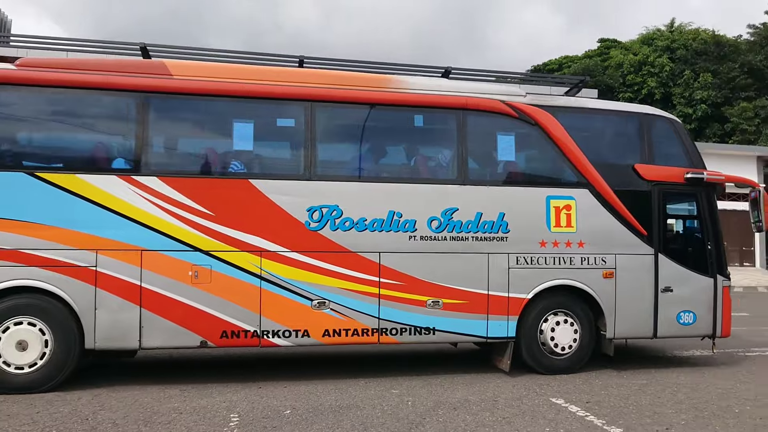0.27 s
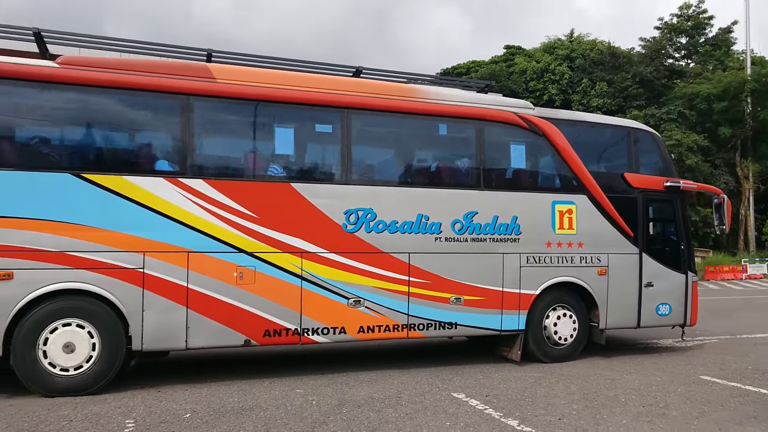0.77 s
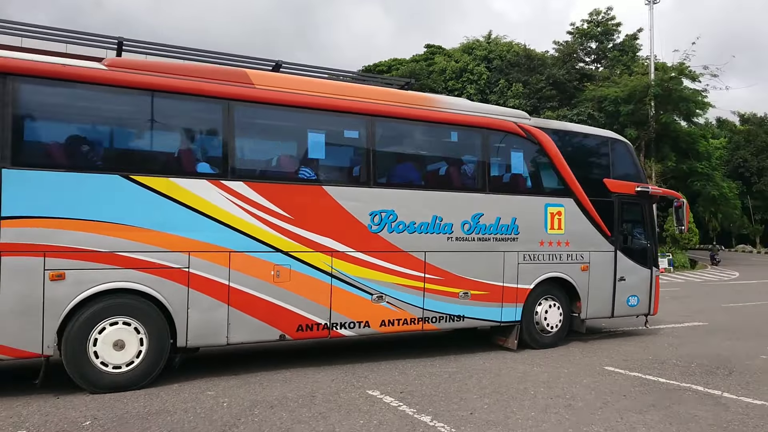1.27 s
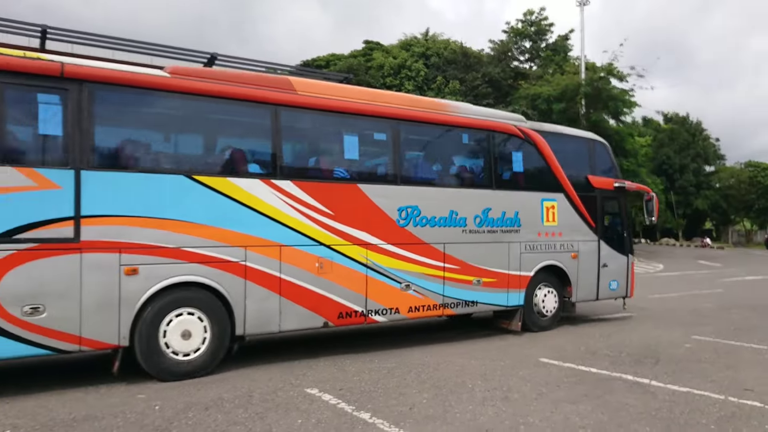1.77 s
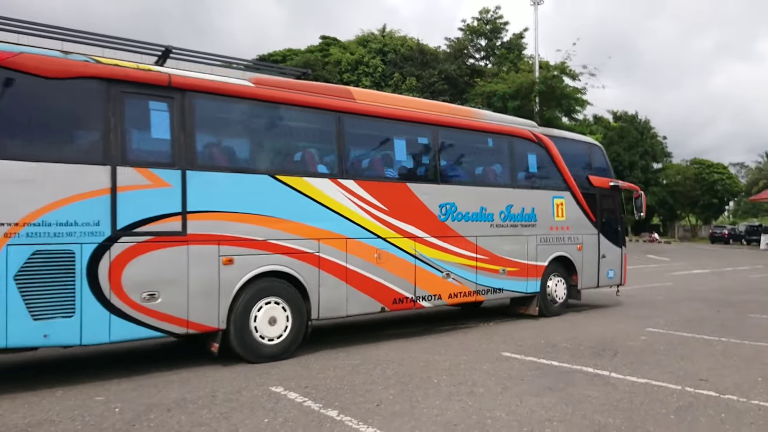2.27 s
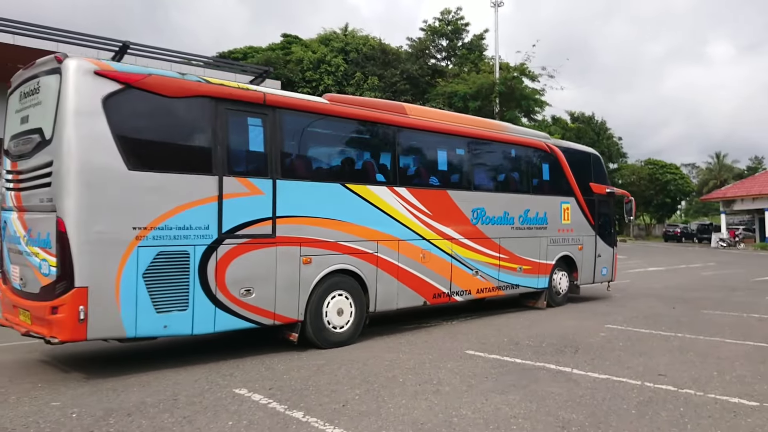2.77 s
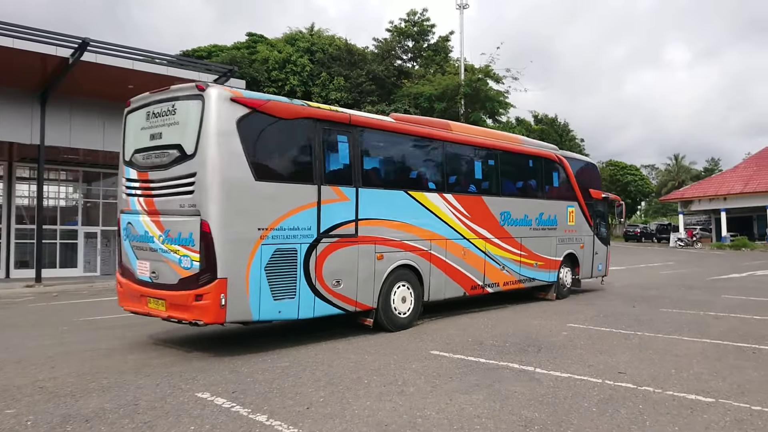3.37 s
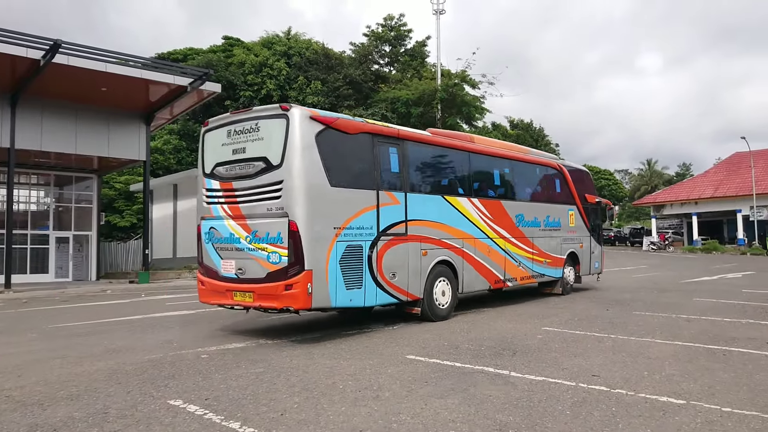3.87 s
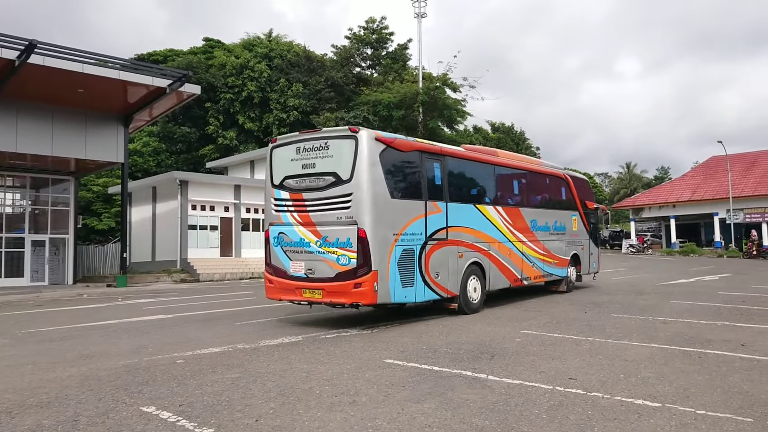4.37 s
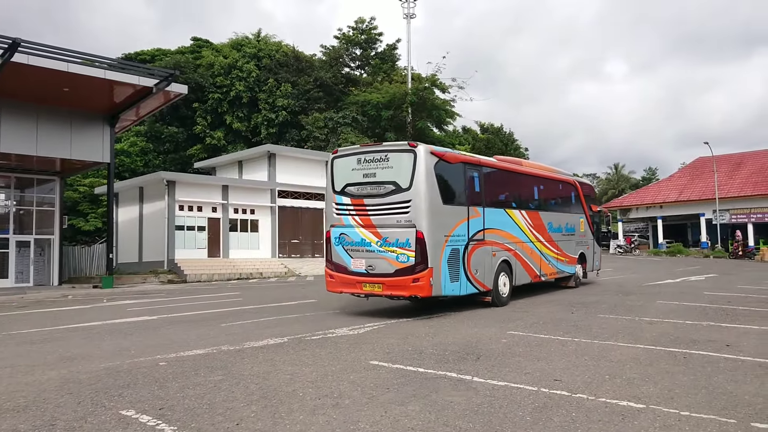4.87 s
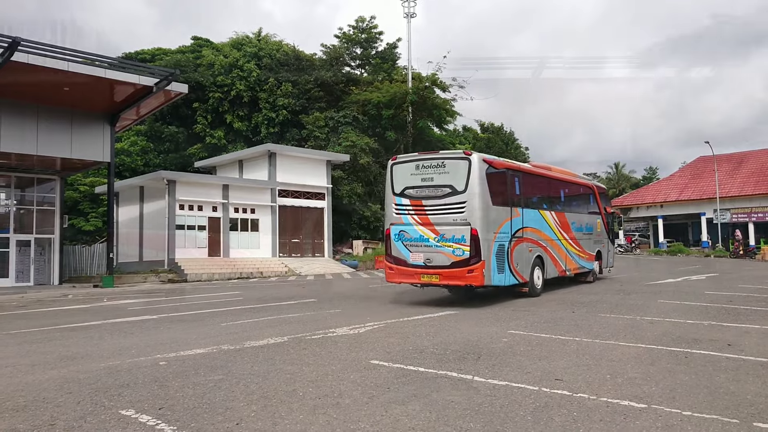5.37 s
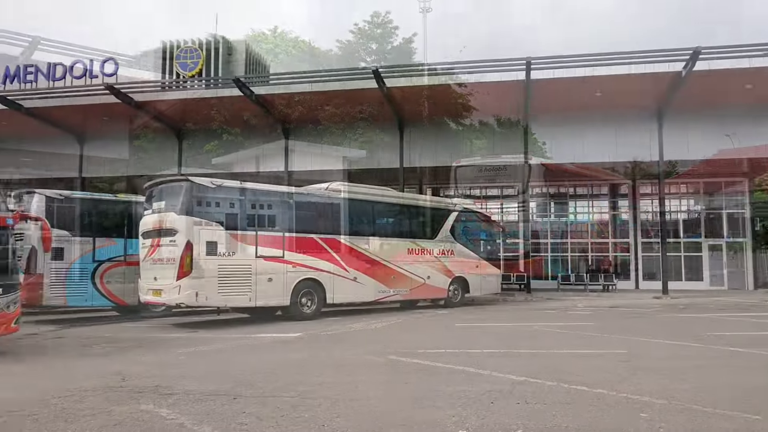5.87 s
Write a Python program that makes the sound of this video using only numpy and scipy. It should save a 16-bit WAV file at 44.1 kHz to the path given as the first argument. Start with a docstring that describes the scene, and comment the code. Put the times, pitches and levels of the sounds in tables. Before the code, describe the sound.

Heard close by on a phone outdoors, a diesel bus lets its revs sink, then takes up the load and rolls past, booming and clattering over a humming fan and a few faint squeaks. Compressed air suddenly blows off in a bright hiss with a wavering whistle. The hiss stops, and the deep engine keeps rising in pitch as it moves away, echoing slightly off the terminal buildings.

```python
"""A diesel coach pulls away across a paved terminal. First the revs drop, with a rasp and a faint turbo
whistle. Then the throttle opens and the clutch takes up: firings boom in the exhaust and clatter in the block,
the cooling fan hums and roars. As the rear engine draws level, a valve blows off compressed air in a whistling
hiss. The air runs out, the tail turns to us and the engine climbs on; then the whole scene fades. A phone with
two microphone ports hears it all directly and off the terminal fronts."""
import sys
import numpy as np
from scipy import signal
from scipy.fft import rfft, irfft, next_fast_len
from scipy.io import wavfile
from scipy.ndimage import uniform_filter1d, map_coordinates

SR = 44100
rng = np.random.default_rng(int(sys.argv[2]) if len(sys.argv) > 2 else 0)


def to_wav(s):
    """Save 16-bit WAV."""
    ch = np.atleast_2d(s).T  # columns
    pcm = np.round(np.clip(ch, -1, 1) * 32767)  # PCM
    wavfile.write(sys.argv[1], SR, pcm.astype(np.int16))


N = 269892
TIME = np.arange(N) / SR
THROTTLE_S, TAIL_TURN_S = (0.84, 1.91), (2.72, 5.17)  # throttle opens, tail turns to us: from, to

# Level laws: dB abreast at cruising revs, dB per octave of revs, dB more off throttle, dB more from behind
CRUISE_HZ = 60
ORDERS_LAW, THROB_LAW = (-40.5, -6, -5, 5.5), (-35, 10, 5, -2.5)
RUMBLE_LAW, WASH_LAW = (-23, 11.5, 0.1, -0.5), (-29, 11.5, -0.4, 2.5)
CLATTER_LAW, KNOCK_LAW = (-32.5, 10, -4.5, 0.5), (-41.5, 8, -1, -3)
LOWER_RING_LAW, UPPER_RING_LAW = (-36.5, 27.5, -8, -14), (-56, 13, -1, 8)


# Fader ride of the boom at the firing rate: t/s, level/dB
BOOM_RIDE = [(0,-31),(.5,-35),(1.1,-38),(1.4,-34),(1.7,-26),(2.1,-28.5),(2.9,-24.5),(3.2,-20.5),(3.8,-19.5),(4.1,-17.5),(4.4,-22.5),(4.7,-23.5),(5.0,-27),(5.25,-22.5),(5.75,-22),(6.12,-26.5)]
# Engine orders around the boom: multiple of the firing rate, level/dB
ENGINE_ORDERS = [(.75,0.5),(1.97,-3),(3,-1)]
# Bass-heavy EQ of the exhaust puffs: f/Hz, level/dB
RUMBLE_EQ = [(20, -47), (33, -25), (45, 4.5), (60, -0.5), (90, 3.5), (130, 1), (200, -1), (270, -3),
             (350, -7), (450, -13), (600, -32), (1200, -65)]

def exhaust(firing_hz):
    """The silencer booms at the firing rate, unequal cylinders throb and turbulent puffs rumble."""
    boom_db, = curves(BOOM_RIDE)
    boom = partials(firing_hz, [(1, 0)], rough=0.09, flutter_hz=13) * undb(boom_db)
    orders = sum(partials(k * firing_hz, [(1, db)], rough=0.2, flutter_hz=9) * body_gain(k * firing_hz)
                 for k, db in ENGINE_ORDERS)
    throb = partials(firing_hz, [(1.53, 0)], rough=0.24, flutter_hz=12)
    puffs = unit(colour(bursts(firing_hz, decay_cycles=0.13, scatter_db=-0.5, steady=0.74), RUMBLE_EQ))
    bass = signal.sosfilt(signal.butter(1, 75, fs=SR, output="sos"), puffs)
    rumble = puffs - 0.44 * coasting() * bass  # thinner off the throttle
    return (boom + orders * loudness(firing_hz, ORDERS_LAW) + throb * loudness(firing_hz, THROB_LAW)
            + rumble * loudness(firing_hz, RUMBLE_LAW))


# Resonant peaks of silencer and body: f/Hz, width/Hz, lift/dB
BODY_PEAKS = [(56.6,3.6,15),(107,12,5),(144.8,4.7,15.5),(150.5,3.9,13),(168.5,5,4),(176,4.8,8.5),(189,5.3,9.5)]

def body_gain(hz):
    """An engine order blooms as it sweeps through a resonance of silencer or body."""
    lift = sum(undb(db) ** 2 / (1 + (2 * (hz - centre) / width) ** 2) for centre, width, db in BODY_PEAKS)
    return np.sqrt(1 + lift)


# Bright, metallic EQ of the block: f/Hz, level/dB
CLATTER_EQ = [(600, -16), (1200, 0.5), (1700, 0), (2200, 2), (2850, 0.5), (3200, -2.5), (3600, -3),
              (4400, 2.5), (5000, -5), (5600, -7.5), (6500, -18), (9000, -11.5), (10500, -18.5),
              (15500, -16.5)]
# Midrange EQ of the off-throttle rasp: f/Hz, level/dB
RASP_EQ = [(600, -36), (1100, 8.5), (1600, 1.5), (2200, 5.5), (2700, -12), (3300, 0), (3700, 2), (4300, 0),
           (5500, -37), (9000, -42)]

def block_clatter(firing_hz):
    """Combustion and valve gear ring the engine block; off the throttle a rasp joins in."""
    clatter = unit(colour(bursts(firing_hz, decay_cycles=0.49, scatter_db=5, steady=0.95), CLATTER_EQ))
    rasp = coasting() * unit(colour(noise(), RASP_EQ)) * undb(1)
    grille_db = 3.4 * swell(2.89, length_s=2)  # the side grille beams the sound as it goes by
    flicker_db = 0.5 * wander(3.4)
    return (clatter + rasp) * loudness(firing_hz, CLATTER_LAW) * undb(grille_db + flicker_db)


# Dry, boxy EQ of the knock: f/Hz, level/dB
KNOCK_EQ = [(400, -24), (700, -2), (1300, 0), (1900, -4.5), (3200, -10), (5000, -26), (8000, -46)]

def knock(firing_hz):
    """Some firings land harder than others and knock through the engine cover."""
    blows = bursts(firing_hz, decay_cycles=0.16, scatter_db=4, steady=0.22)
    return unit(colour(blows, KNOCK_EQ)) * loudness(firing_hz, KNOCK_LAW)


# Blade rate and fader ride of the fan hum: t/s, f/Hz, level/dB
HUM_RIDE = [(0,340.6,-26.5),(.22,298,-24.5),(.45,256,-37),(1.1,177,-51),(1.5,266.8,-37),(1.75,270.3,-32),(1.98,261.6,-34.5),(2.15,255,-44),(2.55,240.5,-44),(3.15,270.7,-30),(3.6,282.5,-45),(3.76,286.6,-31.5),(4.1,295,-27),(4.38,310,-28),(4.58,320.6,-35),(4.8,327.5,-29.5),(5.12,336,-32),(5.27,339.4,-45),(5.5,347,-35.5),(5.82,360,-33.5),(6.12,357,-35.5)]
# Harmonics of the hum: multiple of the blade rate, level/dB
HUM_HARMONICS = [(1, 0), (2, -24)]
# EQ of the fan's wash before the tail turns: f/Hz, level/dB
WASH_SIDE_EQ = [(150, 4.5), (350, 4.5), (500, 2), (660, -1.5), (800, 3.5), (950, 4.5), (1200, -5.5),
                (1700, -10), (2600, -13.5), (5000, -45)]
# EQ of the wash from behind: f/Hz, level/dB
WASH_REAR_EQ = [(150, -10), (350, 7), (500, 1), (720, 4.5), (900, 0), (1150, -4.5), (1700, -9.5),
                (3000, -8.5), (5000, -33)]

def fan(firing_hz):
    """Belt-driven blades hum in uneven inflow and push a broad wash through the grille."""
    blade_hz, hum_db = curves(HUM_RIDE)
    hum = partials(blade_hz, HUM_HARMONICS, rough=0.07, flutter_hz=21) * undb(hum_db)
    behind = ramp(*TAIL_TURN_S)
    side = np.sqrt(1 - behind) * unit(colour(noise(), WASH_SIDE_EQ))
    rear = np.sqrt(behind) * unit(colour(noise(), WASH_REAR_EQ))
    wash = (side + rear) * undb(0.5 * wander(22)) * loudness(firing_hz, WASH_LAW)
    return hum, wash


# Sizzling EQ of the compressed air: f/Hz, level/dB
HISS_EQ = [(1200, -2), (2000, 7.5), (2700, 9.5), (3400, 9), (4200, 11.5), (5200, 10), (6200, 2),
           (8300, 12.5), (10000, 3.5), (13500, 5), (15500, 8.5)]

def air_jet(opens_s=2.275, attack_s=0.07, closes_s=4.32):
    """A valve blows off in a swirling, sputtering jet that sags slowly and dies fast once it closes."""
    envelope_db = -25.5 - 0.5 * (TIME - opens_s) - 30 * since(closes_s)
    accent_db = np.exp(-since(opens_s) / 0.4)  # the first rush is a touch louder
    sputter_db = 0.9 * wander(12)
    valve = ramp(opens_s, opens_s + attack_s)
    _, distance_db = drive_by()
    hiss = unit(colour(swirl(), HISS_EQ))
    return valve * hiss * undb(envelope_db + accent_db + distance_db + sputter_db)


def swirl(depth_db=2, width_hz=270, life_s=0.05, sink_hz_per_s=900):
    """Jet noise whose resonances come and go by chance, sinking while they last."""
    hz, s, frames = signal.stft(noise(), SR, nperseg=512)
    lift = rng.standard_normal(frames.shape)
    for _ in range(2):
        lift = uniform_filter1d(lift, int(width_hz / hz[1]), axis=0)
        lift = uniform_filter1d(lift, int(life_s / s[1]), axis=1)
    rows, columns = np.indices(frames.shape)
    lift = map_coordinates(lift, [rows + sink_hz_per_s * s / hz[1], columns], order=1, mode="mirror")
    _, swirled = signal.istft(frames * undb(depth_db * unit(lift)), SR)
    return unit(swirled[:N])


# Pitch and fader ride of the jet's lead whistle: t/s, f/Hz, level/dB
WHISTLE_RIDE = [(2.27,4800,-80),(2.35,4820,-33),(2.58,4780,-33),(2.72,4680,-33),(2.8,4750,-39),(2.92,4840,-29.5),(3.02,4660,-29),(3.13,4580,-24),(3.27,4490,-31),(3.38,4480,-43),(3.48,4640,-33),(3.62,4540,-27),(3.74,4430,-27),(3.95,4390,-41),(4.1,4460,-36),(4.28,4440,-41),(4.47,4500,-35),(4.62,4470,-42),(4.76,4460,-42),(5.0,4460,-80)]

def jet_whistle(waver_hz=25, rasp_db=3):
    """The jet sings one raspy, breathy note that dips in pitch, then holds as the air runs out."""
    hz, db = curves(WHISTLE_RIDE)
    hz = hz + waver_hz * wander(30)
    core = band(hz, width_hz=130) * undb(rasp_db * wander(160))
    breath = band(hz, width_hz=650)
    return unit(unit(core) + breath) * undb(db)


# Cues for the jet's side whistles: peak t/s, length/s, f/Hz, glide/(Hz/s), width/Hz, level/dB
FLARE_CUES = [(2.6,0.63,10400,3,1300,-38.5),(2.62,0.52,13700,4,1700,-35),(2.5,.3,5300,0,400,-35),(2.47,0.28,3100,595,300,-33),(2.3,.09,3680,0,130,-35),(3.08,.13,2740,0,98,-31),(3.27,.24,4080,-500,220,-35),(3.2,.4,6100,-400,500,-34.5),(3.25,0.46,9150,307,800,-35),(3.08,.2,15000,-4000,690,-38),(3.35,.8,15000,-2200,710,-45),(3.46,.22,5100,-700,100,-34),(4.1,.16,5980,0,160,-39),(3.63,0.17,10500,0,970,-37.5),(2.9,0.15,11000,0,980,-39),(3.95,0.41,10000,-3000,560,-42.5),(3.96,0.067,5780,0,140,-39),(4.28,.5,4700,2,490,-38),(4.78,0.38,5400,0,140,-41)]

def jet_flares():
    """Other pitches break out of the jet briefly, some steady and some gliding."""
    out = np.zeros(N)
    for s, length, hz, glide, width_hz, db in FLARE_CUES:
        on = np.abs(TIME - s) < length / 2
        flare = band(hz + glide * (TIME[on] - s), width_hz, size=on.sum())
        out[on] += flare * swell(s, length)[on] * undb(db)
    return out


def air_rings(firing_hz):
    """Rushing air sings in two breathy bands; a sharper ring leaps out as the valve blows off."""
    lower = band(lower_ring_hz(), width_hz=420) * loudness(firing_hz, LOWER_RING_LAW)
    leap = band(2760, width_hz=210) * undb(-26.5) * swell(2.53, length_s=0.27)
    upper = band(4360, width_hz=590) * loudness(firing_hz, UPPER_RING_LAW)
    return lower + leap + upper


def lower_ring_hz():
    """The lower ring sinks in pitch as the coach passes."""
    bearing_sine, _ = drive_by()
    return 2688 - 409 * bearing_sine


# Cues for squeaks, groans and puffs: peak t/s, length/s, f/Hz, width/Hz, level/dB
SQUEAK_CUES = [(0.05,.12,1000,51,-35),(0.335,0.15,966,31,-33),(0.75,0.14,492,49,-34),(0.868,0.077,12000,5000,-52),(0.906,0.055,2880,260,-35),(1.228,0.12,210.6,54,-23),(1.34,0.088,95,30,-22),(1.5,.6,341,116,-30),(1.805,0.84,2138,374,-36.5),(1.83,0.55,2800,300,-37),(1.8,1,5600,450,-45.5),(1.901,0.34,204,7,-27.5),(2.163,0.27,165.2,10,-28),(2.51,0.13,86.9,11,-20),(2.7,0.8,299.8,40,-31),(3.372,0.28,1798,510,-30.5),(4.23,0.47,2322,332,-33.5),(5.2,.6,2980,300,-39),(6.031,.2,4580,236,-38)]

def squeaks():
    """Rubbing parts and small leaks sound briefly, swelling and fading."""
    return sum(band(hz, width) * swell(s, length) * undb(db) for s, length, hz, width, db in SQUEAK_CUES)


# Pitch and fader ride of the turbo: t/s, f/Hz, level/dB
TURBO_RIDE = [(0, 13400, -68), (.4, 11600, -73), (.8, 9650, -74), (1.1, 8900, -100)]

def turbo():
    """Off the throttle the turbocharger runs down with a thin whistle."""
    hz, db = curves(TURBO_RIDE)
    return band(hz, width_hz=200) * undb(db)


# Head start of the left port: t/s, lead/ms
LEFT_LEAD = [(0, 0.34), (1.8, 0.4), (3.2, .25), (6.1, 0.099)]

def direct_path(x, right_lift_db=1.1):
    """The straight path reaches the left port first, less so as the coach moves ahead."""
    lead_ms, = curves(LEFT_LEAD)
    return np.array([x * undb(-right_lift_db / 2), delayed(x, lead_ms / 1000) * undb(right_lift_db / 2)])


def close_reflection(x, echo):
    """One close reflection adds a hollow comb whose fourth tooth tracks the lower ring."""
    return (x + echo * delayed(x, 4 / lower_ring_hz())) / np.sqrt(1 + echo ** 2)


def building_echoes(x, t60_s, count=14):
    """Each path off the buildings has its own bearing and stretches or shrinks as the coach rolls."""
    out, power = np.zeros((2, N)), 0
    port_lags_s = 0.00025 * rng.permutation(np.linspace(-1, 1, count))
    for delay_s, lag_s in zip(np.linspace(0.025, 0.16, count), port_lags_s):
        stretch = rng.choice([-1, 1]) * rng.uniform(0.002, 0.006)
        path_s = delay_s + stretch * (TIME - TIME.mean())
        emitted_s = np.array([TIME - path_s + lag_s, TIME - path_s - lag_s])
        gain = undb(-60 * delay_s / t60_s)
        out += gain * x[np.abs(emitted_s * SR).astype(int) % N]
        power += gain ** 2
    return out / np.sqrt(power)


def drive_by(speed_m_s=4, abreast_s=2.57, nearest_m=7):
    """The engine rolls past: the sine of its bearing, and its level in dB from distance."""
    along_m = speed_m_s * (TIME - abreast_s)
    distance_m = np.hypot(along_m, nearest_m)
    return along_m / distance_m, 20 * np.log10(nearest_m / distance_m)


def loudness(firing_hz, law):
    """Gain of a layer from revs, throttle, the side of the coach that is heard, and distance."""
    db, per_octave_db, coasting_db, behind_db = law
    _, distance_db = drive_by()
    return undb(db + per_octave_db * np.log2(firing_hz / CRUISE_HZ) + coasting_db * coasting()
                + behind_db * ramp(*TAIL_TURN_S) + distance_db)


def coasting():
    """1 off the throttle, falling to 0 as it opens."""
    return 1 - ramp(*THROTTLE_S)


def partials(hz, table, rough, flutter_hz):
    """Partials locked to a shaft; each flutters in level and phase."""
    angle = 2 * np.pi * np.cumsum(hz) / SR
    out = 0
    for multiple, db in table:
        phase = multiple * angle + rng.uniform(0, 2 * np.pi)
        tone = (1 + rough * wander(flutter_hz)) * np.sin(phase)
        jitter = rough * wander(flutter_hz) * np.cos(phase)
        out = out + undb(db) * (tone + jitter)
    return out * np.sqrt(2 / (1 + 2 * rough ** 2))


def bursts(firing_hz, decay_cycles, scatter_db, steady):
    """Noise that leaps by a random amount at each firing and decays towards a steady bed."""
    cycles = np.cumsum(firing_hz) / SR
    strength = undb(scatter_db * noise())[cycles.astype(int)]
    return noise() * (steady + strength * np.exp(-(cycles % 1) / decay_cycles))


def band(hz, width_hz, size=N):
    """Noise in a narrow resonance whose centre may move."""
    angle = 2 * np.pi * np.cumsum(hz * np.ones(size)) / SR
    return (wander(width_hz, size) * np.sin(angle) + wander(width_hz, size) * np.cos(angle)) / np.sqrt(2)


def wander(rate_hz, size=N):
    """Smooth random modulation at rms 1 that changes about rate_hz times a second."""
    span = max(int(SR / rate_hz), 1)
    smoothed = uniform_filter1d(rng.standard_normal(size), span, mode="wrap")
    return unit(uniform_filter1d(smoothed, span, mode="wrap"))


def noise():
    """White noise."""
    return rng.standard_normal(N)


def colour(x, eq):
    """Apply an EQ curve of (f/Hz, level/dB) points."""
    hz, db = np.transpose(eq)
    size = next_fast_len(N + SR // 2, real=True)
    bin_hz = np.maximum(np.arange(size // 2 + 1) * SR / size, 1)
    gain = undb(np.interp(np.log(bin_hz), np.log(hz), db))
    return irfft(rfft(x, size) * gain, size)[:N]


def delayed(x, seconds):
    """The sound after a path whose length may change."""
    return map_coordinates(x, [np.arange(N) - seconds * SR], order=3, mode="mirror")


def curves(table):
    """The columns of a timed table as automation, one value a sample."""
    s, *columns = np.transpose(table)
    return [np.interp(TIME, s, column) for column in columns]


def ramp(start_s, end_s):
    """Goes from 0 to 1 between two times."""
    return np.interp(TIME, [start_s, end_s], [0, 1])


def swell(peak_s, length_s):
    """A rounded rise and fall around a moment."""
    return np.cos(np.pi * np.clip((TIME - peak_s) / length_s, -0.5, 0.5))


def since(start_s):
    """Seconds since a cue, 0 before it."""
    return np.maximum(TIME - start_s, 0)


def undb(db):
    """Decibels to gain."""
    return 10 ** (np.asarray(db) / 20)


def unit(x):
    """Scale to rms 1."""
    return x / np.sqrt(np.mean(x ** 2))


# The revs, as the engine's firing rate: t/s, f/Hz
FIRING_RATE = [(0, 78.8), (.4, 61.43), (.9, 42.7), (1.1, 42.07), (1.3, 55.73), (1.55, 62.63), (1.85, 61.9),
               (2.2, 54.57), (3.1, 61.26), (4.05, 67.24), (4.8, 76.2), (6.12, 83.95)]

def scene(fade_from_s=5.35, fade_db_per_s=9.5):
    """Four buses of coach sound, mixed direct and sent to the building echoes; all fades at the end."""
    firing_hz, = curves(FIRING_RATE)
    hum, wash = fan(firing_hz)
    low = exhaust(firing_hz) + hum
    clatter = close_reflection(block_clatter(firing_hz), echo=0.15)
    high = wash + clatter + knock(firing_hz) + air_rings(firing_hz) + squeaks() + turbo()
    jet = air_jet() + jet_flares()
    whistle = jet_whistle()
    direct = low + undb(-5) * high + undb(-3) * jet + undb(-5.5) * whistle
    send = undb(-19) * low + undb(-3) * high + undb(-2) * jet + undb(-6.5) * whistle
    fade = undb(-fade_db_per_s * since(fade_from_s))
    return fade * (direct_path(direct) + building_echoes(send, t60_s=0.55))


# EQ of the microphone ports: f/Hz, left level/dB, right level/dB
PORT_EQ = [(15,-32,-28),(42,-5.5,-4.5),(57,-2.5,-6),(330,4.5,4.5),(5800,2.5,3),(6314,-3.5,7),(6570,-5.5,-52),(7530,-29.5,-64),(8050,-7.5,-52),(8590,-9,-48),(10060,7,-8),(12600,7,-3.5),(15000,1.5,-13)]

def record(dry, top_hz=15600):
    """Both ports have a deep notch in the treble, the right one is duller; the top is cut."""
    eq = np.array(PORT_EQ)
    heard = np.array([colour(dry[0], eq[:, [0, 1]]), colour(dry[1], eq[:, [0, 2]])])
    return signal.sosfilt(signal.ellip(10, 0.2, 80, top_hz, fs=SR, output="sos"), heard)


dry = scene()
out = record(dry)
to_wav(out)
```